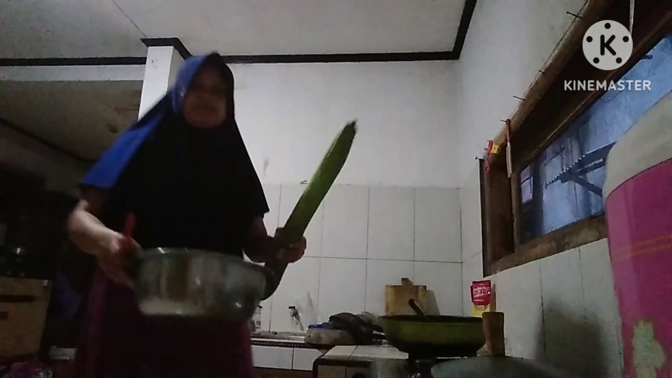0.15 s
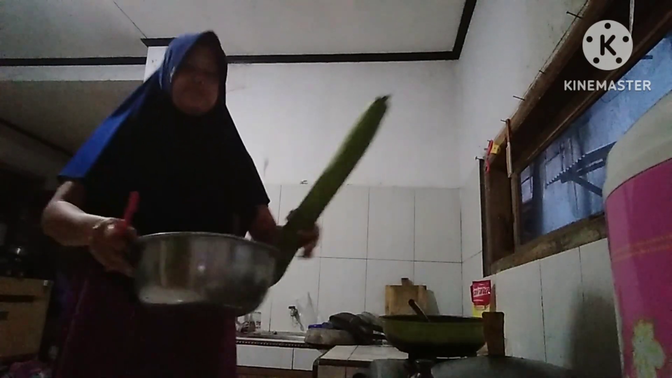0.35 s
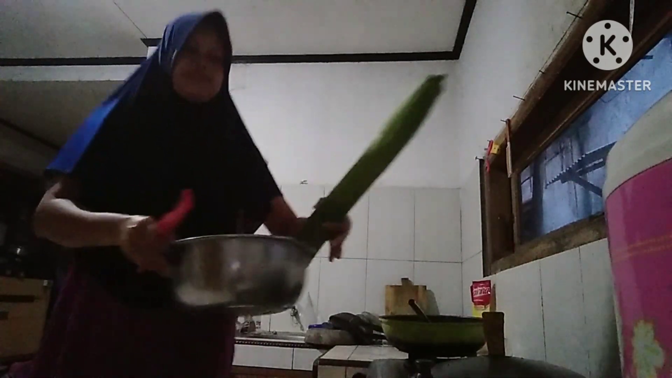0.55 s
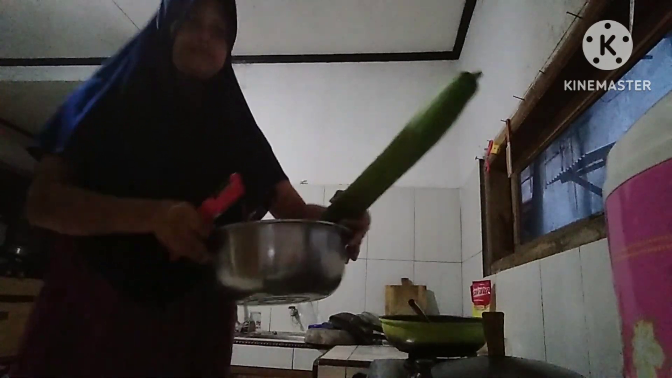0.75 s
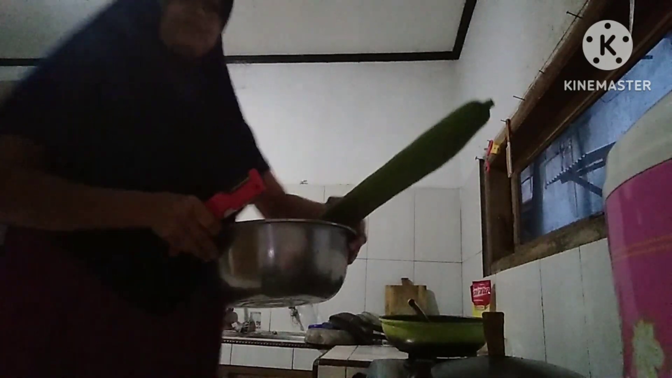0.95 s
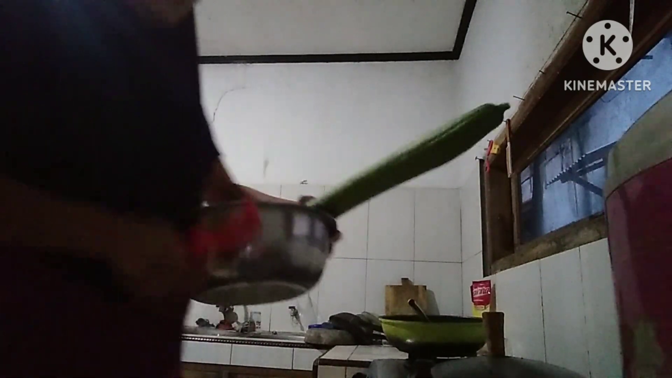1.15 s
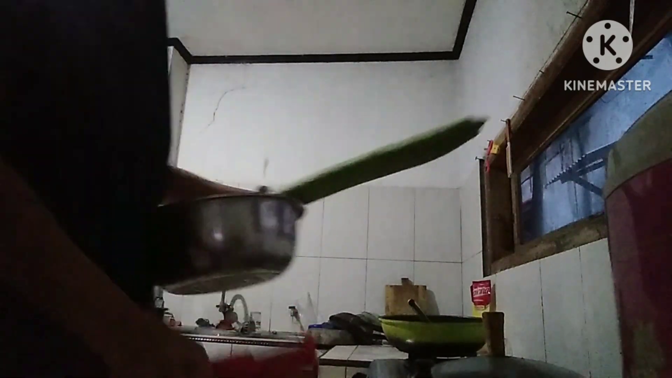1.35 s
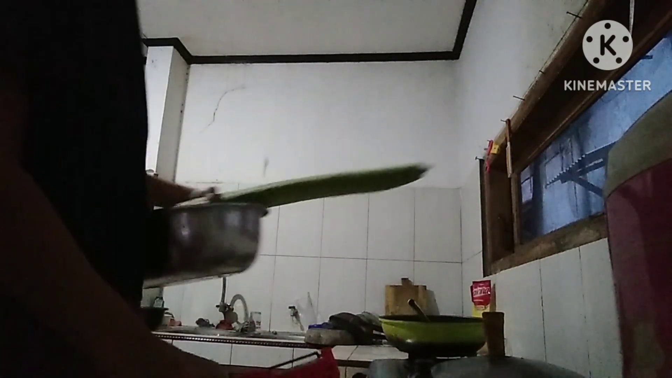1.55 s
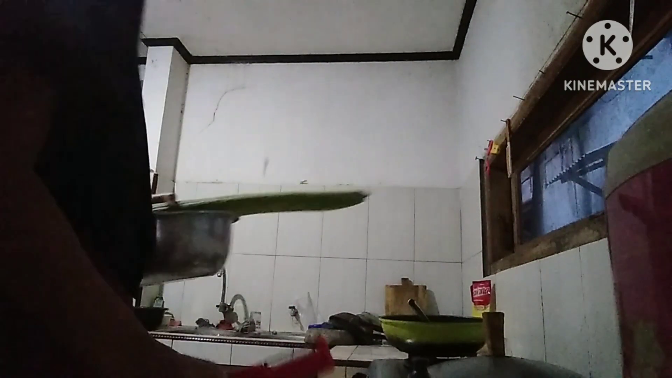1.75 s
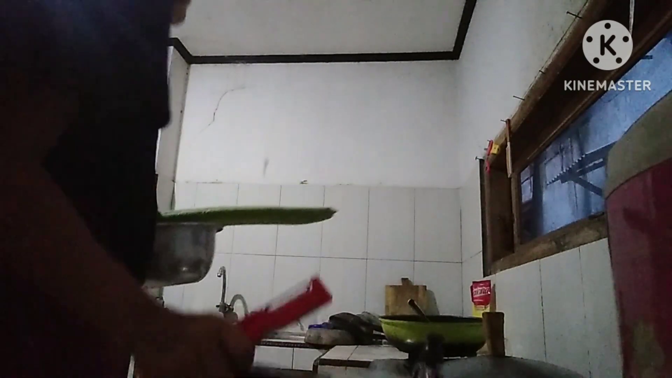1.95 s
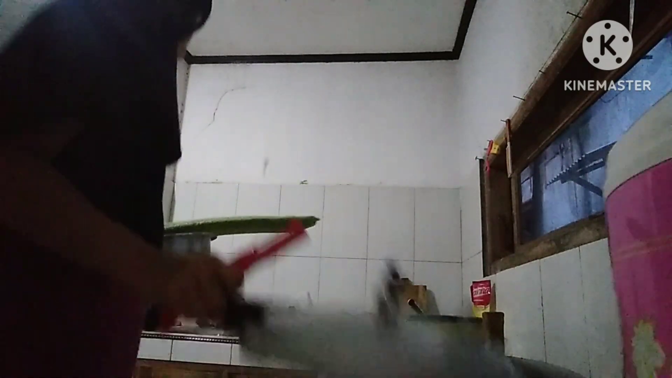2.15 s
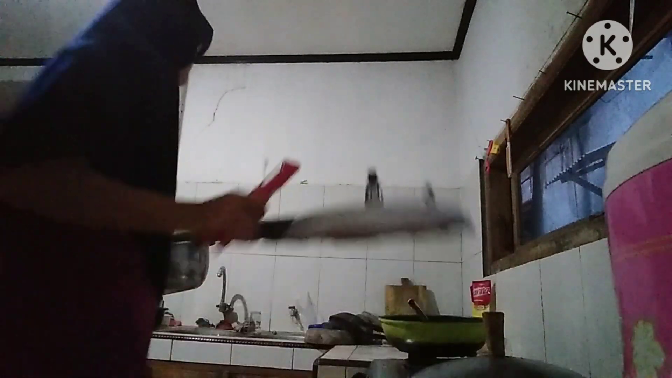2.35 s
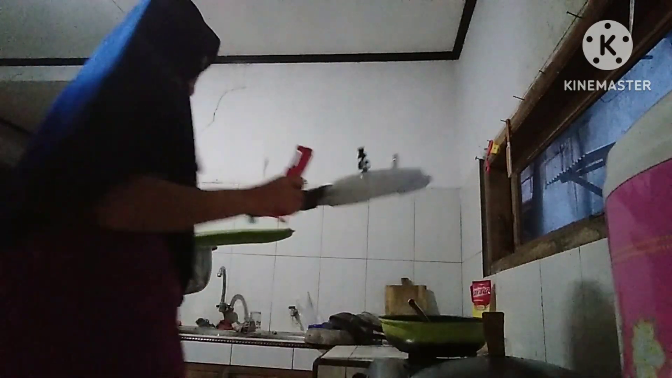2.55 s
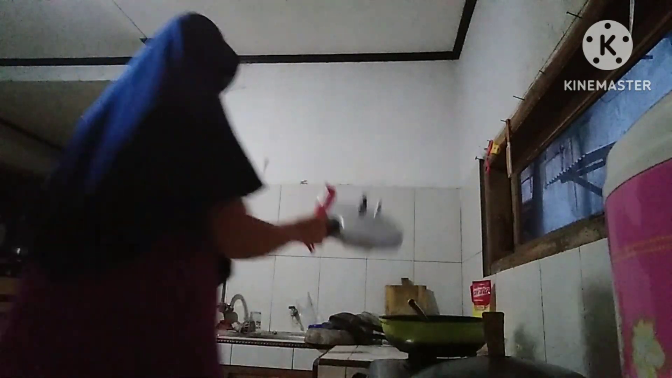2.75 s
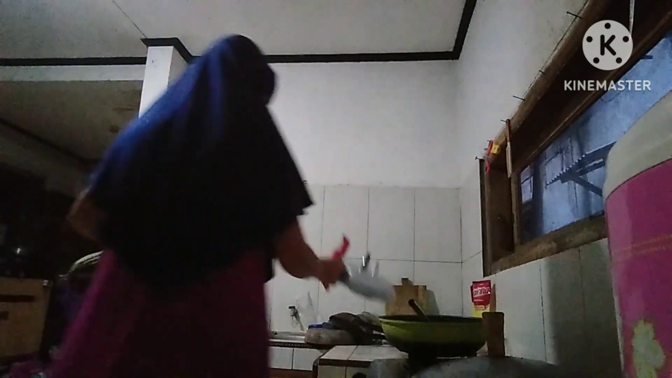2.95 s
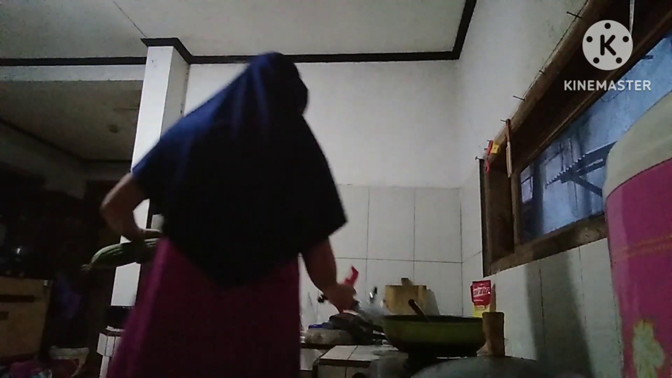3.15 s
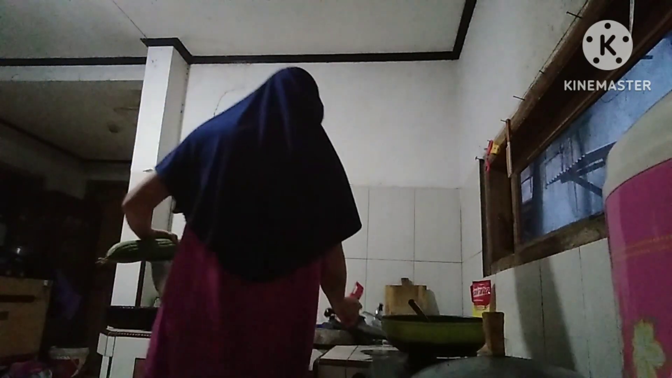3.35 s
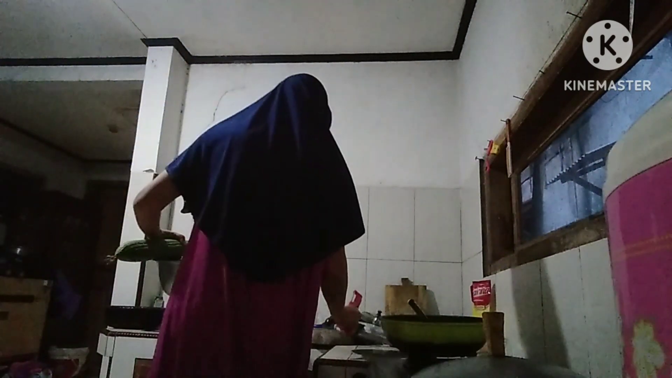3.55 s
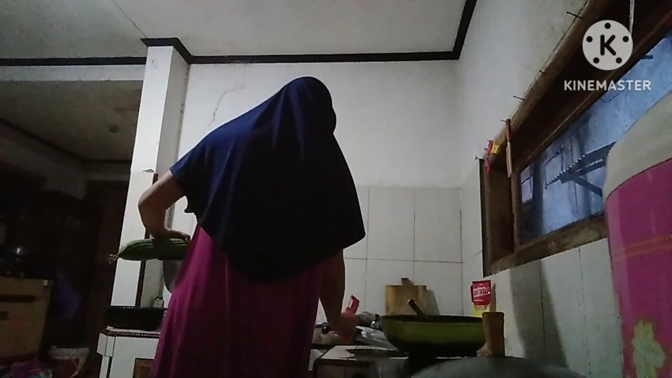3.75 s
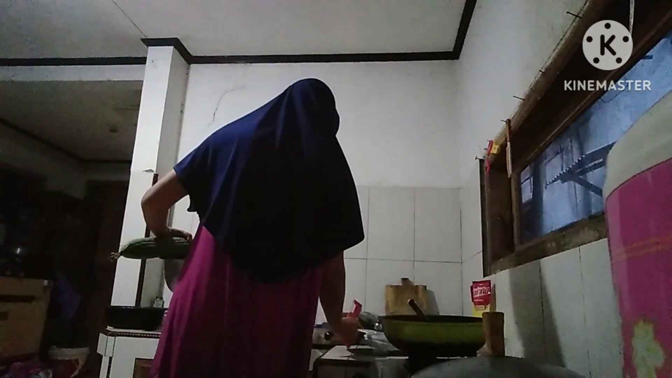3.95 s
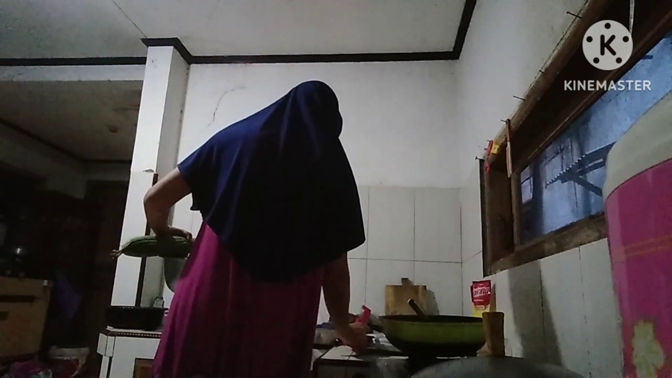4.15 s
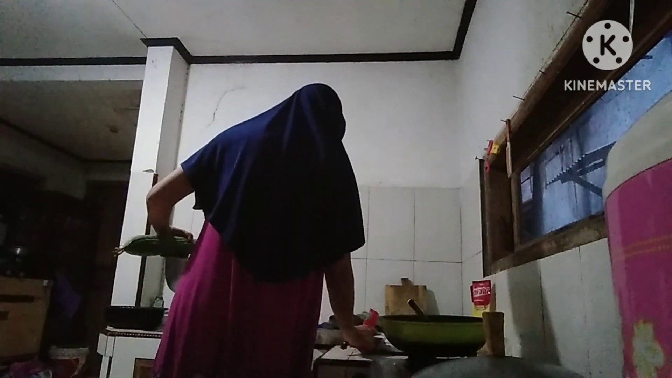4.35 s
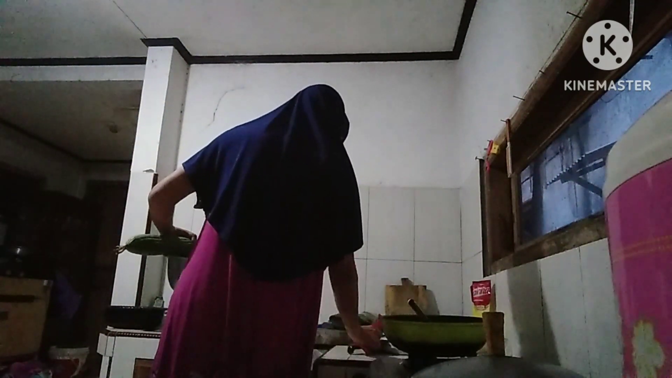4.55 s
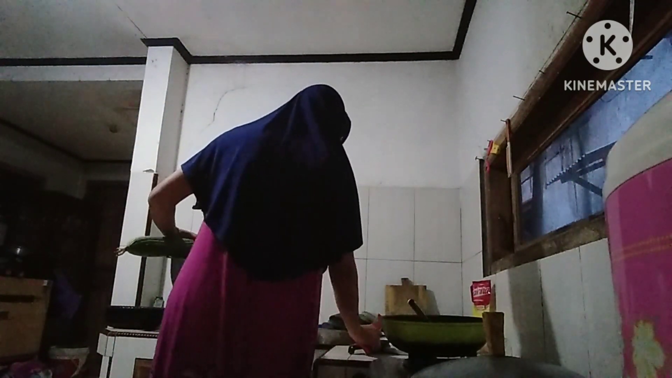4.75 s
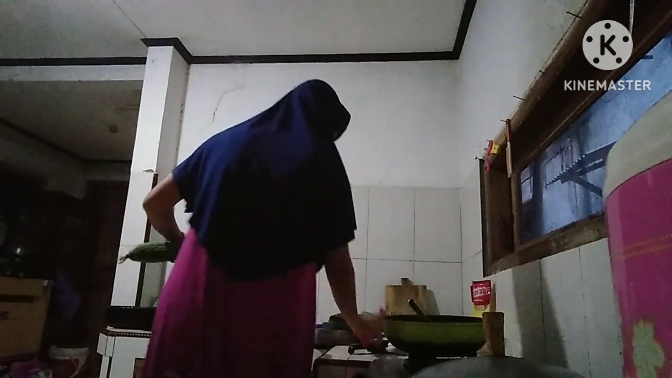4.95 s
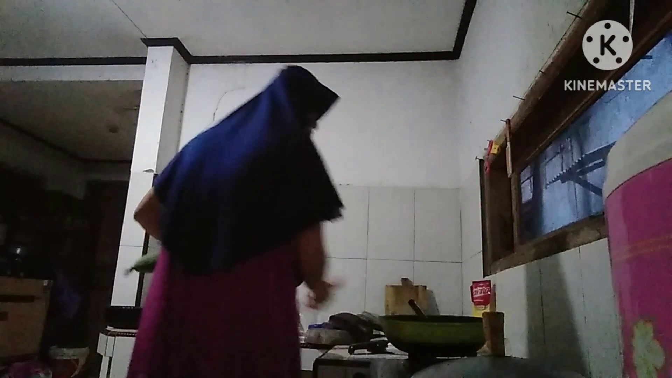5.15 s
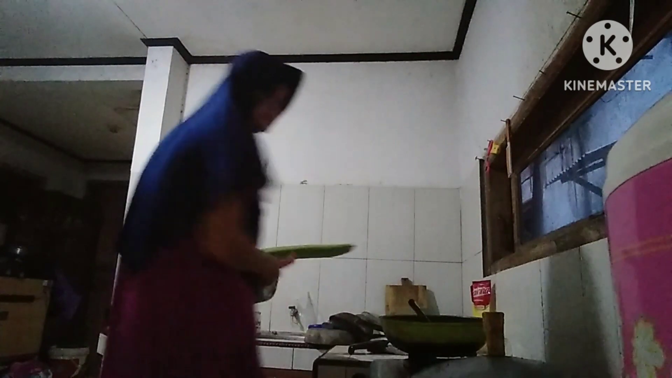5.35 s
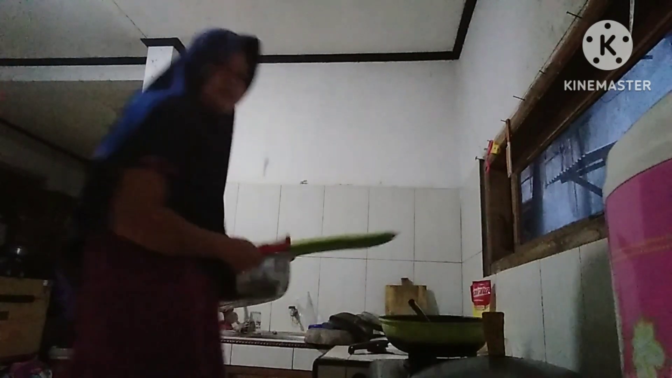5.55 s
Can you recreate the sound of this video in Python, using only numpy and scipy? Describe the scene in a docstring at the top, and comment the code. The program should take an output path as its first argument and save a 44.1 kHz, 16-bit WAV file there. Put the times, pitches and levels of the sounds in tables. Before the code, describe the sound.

A quiet, hard-walled kitchen with faint room noise and low rumble. Clothing brushes and small dull knocks come first, then a quick cluster of metallic taps as a lid touches a pot. After a pause, the lid lands on the counter with a loud clank, rings and scrapes along, with weaker clinks following. Soft rustling and a small click end it. One fixed, slightly bright microphone hears the room echo.

```python
"""A tiled kitchen with a long hard-walled echo: a thin metal lid taps a pot, strikes the counter and slides.
The struck metal is modal synthesis: decaying sines over a short noise rattle standing for dense sheet modes.
The sliding rim is source and filter: rough noise feeding the lid's resonances. Knocks are damped noise bands,
thumps are decaying low sines, rustling clothes are two noise bands that swell and fade together.
Quiet room noise and a slowly heaving rumble lie beneath, and the microphone port colours the events."""
import sys
import numpy as np
from scipy import signal
from scipy.fft import rfft, irfft, next_fast_len
from scipy.io import wavfile
from scipy.ndimage import map_coordinates

SR = 44100
rng = np.random.default_rng(int(sys.argv[2]) if len(sys.argv) > 2 else 0)


def output_pcm(signal):
    """Save a mono or channel-first signal as 16-bit PCM at the path in sys.argv[1].

    Samples are clipped to [-1, 1] before scaling.
    """
    pcm = np.clip(np.atleast_2d(signal).T, -1, 1) * 32767
    wavfile.write(sys.argv[1], SR, np.round(pcm).astype(np.int16))


N = 246519  # samples in the scene

# All levels in the tables are relative: each is added to the other gains along its path.
# spectrum of the room noise: f/Hz, level/dB
AIR_SPECTRUM = [(8.8, -37.5), (15, -0.5), (70, -14), (141, -8), (172, -12), (205, -15.5), (400, -17.5),
                (520, -18.5), (676, -21.5), (1280, -25.5), (1760, -25.5), (2230, -33.5), (14300, -33),
                (15600, -31)]
# fabric brushes: t/s when loudest, hiss level/dB, body level/dB, rise time/s, hiss fall/(dB per s)
FABRIC_BRUSHES = [(.1, -72, -69, 0.19, 100), (0.399, -61, -67.5, 0.0079, 60), (.6, -74, -67, 0.056, 60),
                  (.72, -66.5, -75, 0.089, 38), (.777, -63.5, -72, 0.0054, 250),
                  (1.036, -67.5, -72, 0.035, 76), (1.49, -72, -72, 0.33, 50),
                  (1.8, -71.5, -72.5, .05, 21.5), (2.255, -69.5, -69.5, 0.029, 67),
                  (2.81, -74.5, -76, 0.033, 31), (2.94, -73, -71, 0.031, 122), (3.2, -83, -85, .08, 38.5),
                  (3.44, -76, -76, .08, 9), (5.25, -75, -75.5, 0.107, 35), (5.391, -68.5, -73, 0.0075, 33),
                  (5.476, -69, -65.5, 0.011, 82.5)]
# spectrum of rubbing fabric, also used for the knocks' ticks: f/Hz, level/dB
CLOTH_SPECTRUM = [(300, -13), (800, -6), (2500, -5.5), (4200, -11), (7000, -9), (10500, -17.5),
                  (15500, -16)]
# dull knocks and faint rings: t/s, level/dB, ring f/Hz, half-width/f, rise constant/s, t60/s
ROOM_KNOCKS = [(.01, -74.5, 877, 0.019, 0.035, 1.5), (.398, -56, 2570, .15, 0.0012, 0.039),
               (.444, -52.5, 3120, .35, .001, 0.041), (0.564, -56, 2590, 0.44, 0.0018, 0.047),
               (.774, -45.5, 1170, .13, 0.0021, 0.039), (0.779, -51.5, 356, .9, 0.0021, 0.1),
               (.891, -52, 1300, .3, .0007, 0.051), (1.155, -64.5, 1134, .11, 0.004, 0.16),
               (1.776, -60.5, 1160, .21, .005, 0.073), (1.795, -59.5, 416, .073, .012, .37),
               (1.832, -53.5, 386.6, .034, 0.0045, .11), (1.895, -59, 1300, .15, .003, 0.043),
               (2.71, -62, 622, .088, .015, 0.2), (2.94, -57, 638, .074, 0.012, 0.2),
               (3.288, -77, 1720, .0063, 0.011, .41), (3.559, -51, 308.6, .22, 0.0044, 0.11),
               (3.778, -57.5, 142, .34, .007, .053), (4.15, -53, 232, .039, .024, 0.28),
               (4.569, -47, 359, .3, .003, 0.34), (4.715, -50, 393, .085, .007, 0.21),
               (5.11, -75.5, 5500, .014, 0.055, 0.73), (5.469, -61.5, 6130, .07, .004, 0.12),
               (5.472, -56.5, 1460, .23, 0.0032, 0.046)]
# low thumps through floor or counter: t/s, level/dB
LOW_THUMPS = [(.774, -54.5), (4.149, -66)]
# the lid taps the pot: t/s, level/dB, treble level/dB, bass level/dB, rattle decay constant/s,
# favoured f/Hz, favoured level/dB
POT_TAPS = [(1.905, -30.5, 4, -6, 0.0046, 4060, 15.3), (1.963, -36.5, 2, -8, 0.0038, 2000, 5),
            (1.969, -21.5, 5, -29, 0.0032, 3860, 11), (1.975, -25, -7, -2, 0.0069, 520, 6.6)]
# modes of the pot: f/Hz
POT_MODE_HZ = [500, 684, 1087, 1276, 1626, 1809, 2083, 2450]
# the same modes: level/dB, t60/s
POT_MODES = [(-0.5, 0.067), (-4.5, 0.23), (-0.5, 0.044), (1, 0.049), (-6, 0.089), (-2.5, 0.099),
             (-17, 0.31), (-28, 0.1)]
# dense modes of the pot, heard as a rattle: f/Hz, level/dB
POT_RATTLE = [(60, -45), (120, -13), (330, -23), (550, -3.5), (900, -16.5), (1500, -11), (2400, -5),
              (3300, -15), (5200, -21), (8500, -26), (15500, -45)]
# the lid meets the counter: columns as for the pot taps
LID_BLOWS = [(3.556, -36.5, 10, 11, 0.02, 684, 5), (3.770, -15.5, 7.5, 7, 0.0062, 1340, 8.5),
             (3.776, -10.5, 0.5, -1, 0.0078, 2200, 7), (3.797, -18, 4, -1.5, 0.0048, 620, 3.5),
             (4.508, -35, -1, -1, 0.022, 2470, 8), (4.566, -27.5, 7.5, -10.5, 0.012, 1560, 0.5),
             (4.59, -34, 1.5, 1, 0.016, 435.5, 21.5), (4.713, -36.5, -2, -24, 0.012, 1510, 2),
             (4.63, -45, -1, -6, 0.0062, 1500, -5)]
# modes of the lid: f/Hz
LID_MODE_HZ = [484, 544, 642, 894, 1060, 1150, 1230, 1361, 1522, 1594, 1690, 1800, 1914, 2005, 2209, 2304,
               2421, 2616, 2824, 3930, 4657, 5130, 5350, 5730, 6550, 7200]
# the same modes: struck level/dB, struck t60/s, dragged level/dB
LID_MODES = [(-8, 0.84, -15), (-1, 0.67, -0.5), (6, 0.21, 0), (-4.5, 0.42, -10.5), (-26, 0.96, 1.5),
             (-0.5, .4, -19), (-9.5, 0.74, -10.5), (-0.5, 0.19, -2), (-3.5, 0.53, -5), (1, 0.45, 1),
             (-3.5, 0.55, -5.5), (-10.5, .5, 1), (-5.5, 0.1, -16.5), (-2.5, 0.51, 2), (-11, 0.16, -11.5),
             (-6, .3, -4.5), (0, 0.25, 1.5), (-6.5, 0.28, -8), (-5.5, 0.43, -16), (-18, 0.18, -14.5),
             (-20.5, 0.36, -11.5), (-14.5, 0.22, -9), (-19.5, .2, -18), (-27.5, 0.15, -12),
             (-18.5, .25, -25.5), (-24, 0.17, -23.5)]
# dense modes of the lid sheet, heard as a rattle: f/Hz, level/dB
LID_RATTLE = [(60, -50.5), (130, -32.5), (350, -20), (600, 0), (850, -10.5), (1400, -3), (2300, -11.5),
              (3100, -16.5), (5000, -25), (8500, -31.5), (15500, -44.5)]
# the rim drags along the counter: start t/s, length/s, low level/dB, treble level/dB, low fall/(dB per s)
RIM_STROKES = [(3.577, 0.18, -53, -45, 18), (3.85, 0.36, -42, -46, 31.5), (4.147, 0.69, -47.5, -45.5, 39.5),
               (4.487, 0.27, -43.5, -50, 57)]
# broad scrape under the dragged modes: f/Hz, level/dB
SCRAPE_SPECTRUM = [(250, -23.5), (500, -1.5), (1300, -18), (2500, -12.5), (3500, -22), (5400, -24),
                   (8000, -25.5), (15500, -36.5)]
# one mode sings on its own under the rim: t/s when loudest, level/dB, swell/s
RIM_SONGS = [(4.17, -55.5, 0.027), (4.44, -60.5, 0.16)]
# reverberation time of the kitchen: f/Hz, t60/s
KITCHEN_T60 = [(150, 0.88), (600, 0.62), (2000, 0.58), (5000, 0.4), (12000, 0.31)]
# resonances of the microphone port: f/Hz, level/dB
PORT_RESPONSE = [(4800, 0), (5700, 2.5), (6500, 7.5), (7300, 1), (8200, -3), (12500, -1), (15400, 9)]

AIR_DB = -67.5
TOP_HZ = 15650  # upper band limit of the sound
BODY_FOLLOWS = 0.63  # the fabric's body rises and falls by this share of the hiss's dB
RISE_SPAN_DB = 11  # climbed by the hiss in one rise time
TICK_DB, TICK_DB_PER_OCTAVE = -10, 4.5  # tick over a 1 kHz ring; harder, higher knocks tick more
CRACK_S, CRACK_HZ = 0.003, 7000  # the first touch of metal: decay constant, lower edge
STROKE_RISE_S, STROKE_STOP_S = 0.046, 0.028  # time constants
TREBLE_FALL_SHARE = 0.57  # the treble fades more slowly than the low modes
SONG_HZ, SONG_WIDTH_HZ = 1228, 30


def amp(db):
    """Level to amplitude: 20 dB is a factor of ten."""
    return 10 ** (np.asarray(db) / 20)


def unit(x):
    """Normalisation of x to an rms of 1."""
    return x / np.sqrt(np.mean(x ** 2) + 1e-20)


def along(points, hz):
    """Linear interpolation of (f/Hz, value) points on a logarithmic frequency axis."""
    f, value = np.transpose(points)
    return np.interp(np.log(hz + 1), np.log(f + 1), value)


def wobble(rate):
    """Spline interpolation of random knots, rate of them a second: a smooth random curve."""
    knots = rng.standard_normal(int(N * rate / SR) + 4)
    return map_coordinates(knots, [np.arange(N) * rate / SR])


def filtered(x, response):
    """Linear filtering: the spectrum of x times a response of frequency."""
    m = next_fast_len(len(x) + 8192)
    spectrum = rfft(x, m) * response(np.fft.rfftfreq(m, 1 / SR))
    return irfft(spectrum, m)[:len(x)]


def noise(count, level_db):
    """Spectral shaping: white noise given the spectrum level_db(f/Hz), at rms 1."""
    return unit(filtered(rng.standard_normal(count), lambda hz: amp(level_db(hz))))


def echoed(x, wet_db, sent=None):
    """Diffuse reverberation: x plus its walls' noise tail, each frequency dying at its own speed."""
    hz, t, z = signal.stft(rng.standard_normal(min(len(x), SR)), SR, nperseg=256)
    decay = amp(-60 * t / along(KITCHEN_T60, hz)[:, None])
    tail = signal.istft(z * decay, SR, nperseg=256)[1]
    tail = np.pad(tail / np.linalg.norm(tail), (200, 0))  # 200 samples before the first reflection
    to_walls = x if sent is None else sent  # the walls may hear another sound
    return x + amp(wet_db) * signal.fftconvolve(to_walls, tail)[:len(x)]


def add(track, s, x):
    """Superposition: x is summed into track from second s."""
    part = track[round(s * SR):][:len(x)]
    part += x[:len(part)]


def room_air():
    """Stationary noise: room tone and microphone hiss, with a slowly heaving low-pass rumble."""
    rumble = noise(N, lambda hz: -40 * np.log10(1 + hz / 150) - 12 * (hz < 30))
    rumble *= amp(-87.0 + 1.8 * wobble(8.4))
    air = noise(N, lambda hz: along(AIR_SPECTRUM, hz))
    return amp(AIR_DB + 0.41 * wobble(0.72)) * air + rumble


def clothes():
    """Friction noise: fabric brushes on fabric, a bright hiss with a duller, steadier body."""
    t, hiss_gain, body_gain = np.arange(N) / SR, 0, 0
    for s, hiss_db, body_db, rise, fall in FABRIC_BRUSHES:
        drop_db = np.where(t < s, RISE_SPAN_DB * (s - t) / rise, fall * (t - s))
        # overlapping brushes add in power
        hiss_gain = np.hypot(hiss_gain, amp(hiss_db - drop_db))
        body_gain = np.hypot(body_gain, amp(body_db - BODY_FOLLOWS * drop_db))
    hiss = noise(N, lambda hz: along(CLOTH_SPECTRUM, hz) - 25 * (hz < 4300))
    body = noise(N, lambda hz: along(CLOTH_SPECTRUM, hz) - 25 * (hz > 4300))
    return amp(1.7 * wobble(40)) * (hiss_gain * hiss + body_gain * body)


def knocks():
    """Impulse response of damped resonators: a ringing noise band with a dry tick, and a few low thumps."""
    out, t = np.zeros(N), np.arange(SR * 2 // 3) / SR
    for s, db, ring_hz, width, rise, t60 in ROOM_KNOCKS:
        band = lambda hz: -10 * np.log10(1 + ((hz - ring_hz) / (width * ring_hz)) ** 4)
        ring = noise(len(t), band) * amp(-60 * t / t60)
        ring *= 1 - np.exp(-t / rise)
        tick = noise(len(t), lambda hz: along(CLOTH_SPECTRUM, hz)) * amp(-60 * t / 0.025)
        tick_db = TICK_DB + TICK_DB_PER_OCTAVE * np.log2(ring_hz / 1000)
        add(out, s, amp(db) * echoed(ring + amp(tick_db) * tick, wet_db=1.0))
    thump = np.sin(2 * np.pi * 212 * t) * amp(-60 * t / 0.39)
    thump += 1.09 * np.sin(2 * np.pi * 80 * t) * amp(-60 * t / 0.13)
    thump *= 1 - np.exp(-t / 0.0039)
    for s, db in LOW_THUMPS:
        add(out, s, amp(db) * echoed(thump, wet_db=-4))
    return out


def struck_metal(hits, mode_hz, modes, clatter, ring_db, gain_db, wet_db, ring_wet_db, spot_share, crack_db):
    """Modal superposition: a short rattle of dense sheet modes, a crack, and the clearest modes ringing on."""
    out, t = np.zeros(N), np.arange(SR * 3 // 4) / SR
    rise = 1 - np.exp(-t / 0.00036)
    for s, db, treble_db, bass_db, contact, spot_hz, spot_db in hits:
        # the place of the blow tilts the spectrum and favours the modes near one frequency
        tilt = [(350, bass_db), (1000, 0.011), (2800, 0.0056), (6000, treble_db)]
        slope = lambda hz: along(tilt, hz)
        spot = lambda hz: spot_db * np.exp(-(np.log((hz + 1) / spot_hz) / 0.17) ** 2)
        rattle = noise(len(t), lambda hz: along(clatter, hz) + slope(hz) + spot(hz))
        rattle *= np.exp(-t / contact)
        # the walls hear the blow from all sides: its colour is evened out and spread over the first bounces
        around = noise(len(t), lambda hz: along(clatter, hz) + slope(hz) + spot_share * spot(hz))
        around *= np.exp(-t / 0.013) * np.sqrt(contact / 0.023)
        ring = np.zeros(len(t))
        for hz, mode in zip(mode_hz, modes):
            mode_db = mode[0] + slope(hz) + spot(hz) + rng.normal(0, 1.1)
            ring += amp(mode_db - 60 * t / mode[1]) * np.sin(2 * np.pi * (hz * t + rng.random()))
        crack = noise(SR // 10, lambda hz: -20 * np.log10(1 + (CRACK_HZ / (hz + 1)) ** 2))
        crack *= np.exp(-t[:SR // 10] / CRACK_S)
        add(rattle, 0, amp(crack_db + treble_db) * crack)
        add(around, 0, amp(crack_db + treble_db - 3.5) * crack)
        blow = echoed(rise * rattle, wet_db, around)
        blow += amp(ring_db) * echoed(rise * ring, ring_wet_db)
        add(out, s, amp(db + gain_db) * blow)
    return out


def pot_taps():
    """Free vibration of a damped shell: the lid taps the pot, whose modes mostly die quickly."""
    return struck_metal(POT_TAPS, POT_MODE_HZ, POT_MODES, POT_RATTLE, ring_db=-10, gain_db=-4,
                        wet_db=-3.5, ring_wet_db=-6.5, spot_share=0.31, crack_db=-29.5)


def lid_blows():
    """Free vibration of a thin plate: the lid meets the counter and its modes ring on."""
    return struck_metal(LID_BLOWS, LID_MODE_HZ, LID_MODES, LID_RATTLE, ring_db=-18, gain_db=-6,
                        wet_db=3.0, ring_wet_db=-16.0, spot_share=0.96, crack_db=-31.5)


def slide():
    """Forced vibration: the rim drags over the counter, its rough grit feeding the lid's resonances."""
    t = np.arange(N) / SR
    low_gain, high_gain = np.zeros(N), np.zeros(N)
    for s, length, db, treble_db, fall in RIM_STROKES:
        since = np.clip(t - s, 0, None)
        touch = 1 - np.exp(-since / STROKE_RISE_S)
        touch *= np.exp(-np.clip(since - length, 0, None) / STROKE_STOP_S)
        low_gain = np.hypot(low_gain, touch * amp(db - fall * since))
        high_gain = np.hypot(high_gain, touch * amp(treble_db - TREBLE_FALL_SHARE * fall * since))
    song_gain = sum(amp(db) * np.exp(-((t - s) / swell) ** 2) for s, db, swell in RIM_SONGS)
    grit = rng.standard_normal(N) * amp(2.2 * wobble(25) + 1.1 * wobble(300))

    def resonance(f, centre, width):
        return 1j * f * width / (centre * centre - f * f + 1j * f * width)

    def lid_body(f):
        response = amp(along(SCRAPE_SPECTRUM, f)).astype(complex)
        for k, (centre, mode) in enumerate(zip(LID_MODE_HZ, LID_MODES)):
            width = 8 + 0.0028 * centre  # the counter damps the modes more than free air does
            response += (-1) ** k * amp(mode[2]) * resonance(f, centre, width)
        return response

    drag = unit(filtered(grit, lid_body))
    high = filtered(drag, lambda f: 1 / (1 + (3200 / (f + 1)) ** 6))
    song = unit(filtered(grit, lambda f: resonance(f, SONG_HZ, SONG_WIDTH_HZ)))
    return echoed(low_gain * (drag - high) + high_gain * high + song_gain * song, wet_db=-8.5)


def scene():
    """Superposition of everything that moves in the kitchen."""
    return (clothes() + knocks() + pot_taps() + lid_blows() + slide())[None]


def record(dry):
    """Linear filtering: the port colours the events, room noise joins, and a band limit cuts the top."""
    heard = filtered(dry[0], lambda hz: amp(along(PORT_RESPONSE, hz))) + room_air()
    return filtered(heard, lambda hz: hz < TOP_HZ)[None]


dry = scene()
out = record(dry)
output_pcm(out)
```